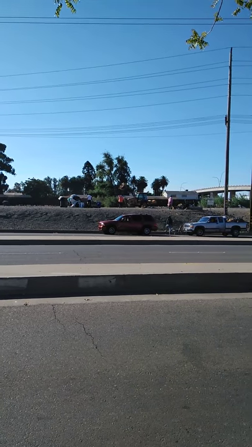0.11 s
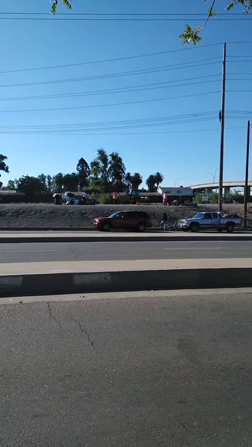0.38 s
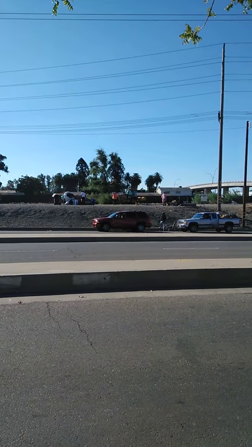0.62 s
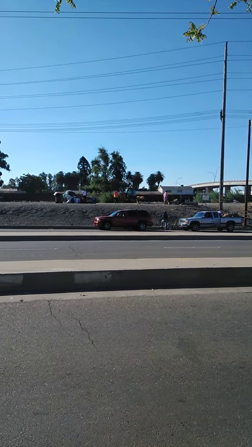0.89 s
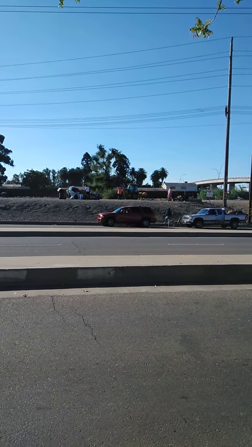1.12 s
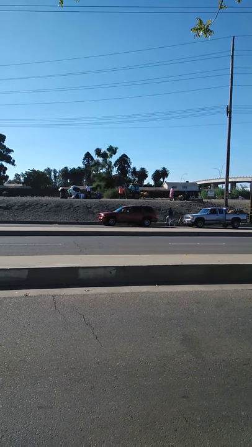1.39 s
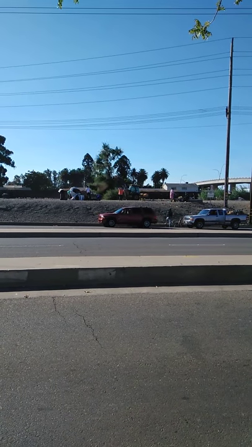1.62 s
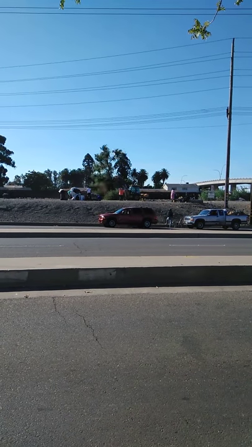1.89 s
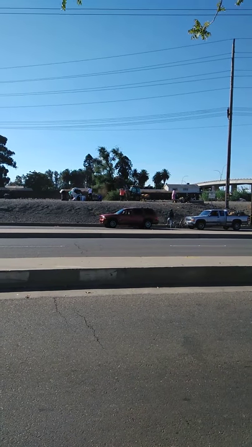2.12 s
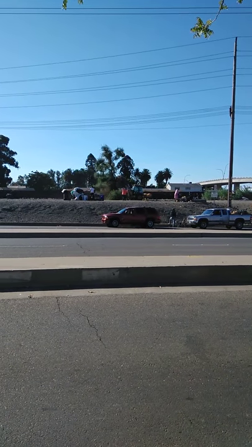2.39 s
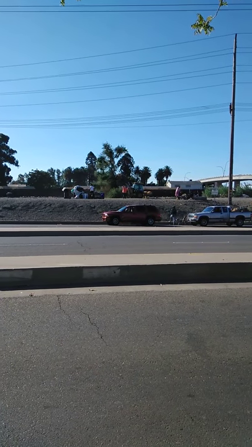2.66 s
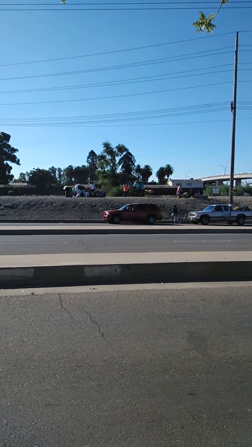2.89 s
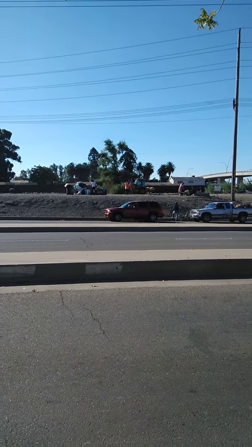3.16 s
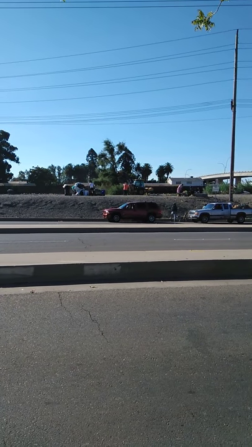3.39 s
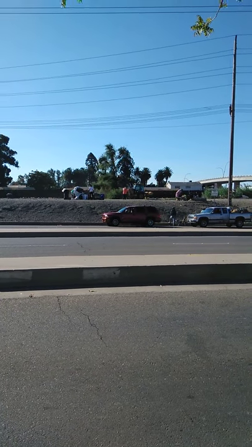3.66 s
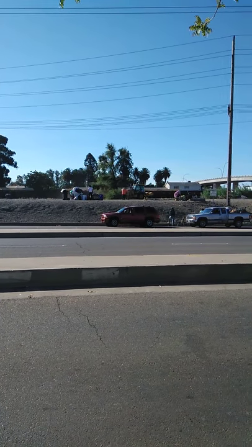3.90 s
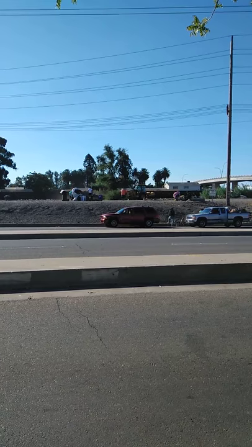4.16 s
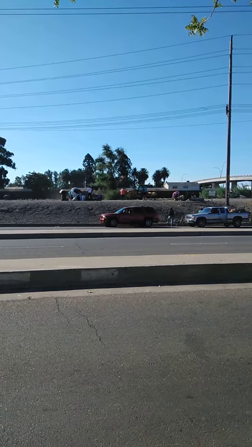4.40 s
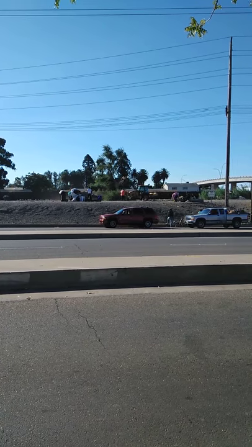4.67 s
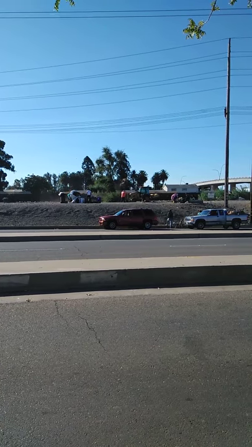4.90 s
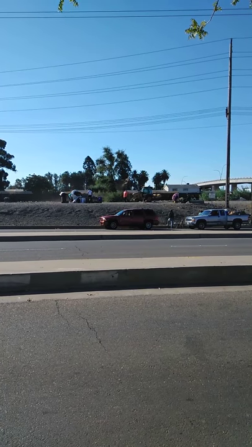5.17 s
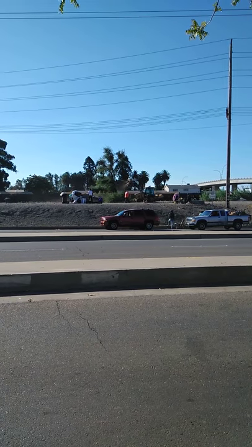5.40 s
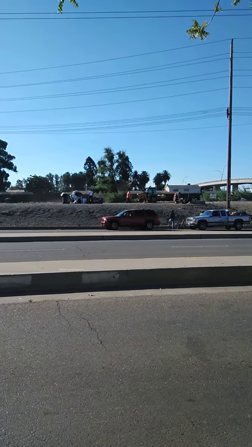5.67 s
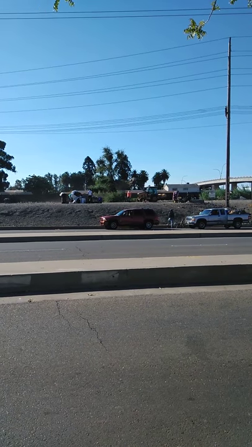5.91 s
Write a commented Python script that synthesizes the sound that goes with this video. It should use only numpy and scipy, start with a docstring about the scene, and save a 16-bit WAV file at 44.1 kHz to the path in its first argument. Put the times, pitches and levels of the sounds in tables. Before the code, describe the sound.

Open air beside a road, heard on a handheld phone whose two channels differ in phase and brightness. From 0 s a bulldozer diesel is already climbing, a low pulsing exhaust tone with roar, gritty knock, valve clatter and steady airy hiss, plus a very faint fuzzy high whistle. At 0.85-1.3 s it peaks with a crowded burst of thuds, bright clangs and a ringing blade tone. Revs fall until about 2.1 s, leaving hiss and small knocks. It climbs again from 2.3 to 2.95 s, then drops; a loud hollow steel clonk rings at 3.15 s, with lesser clanks to 3.8 s. A third climb reaches its top around 4.3-4.5 s, when tracks rattle and clang repeatedly until about 5.3 s. The engine sinks and fades to 6 s amid small hollow taps. A second engine's low hum swells at times over faint road rumble.

```python
"""A bulldozer's diesel revs up three times under load: firing orders plus noise that puffs once a firing.
A turbocharger whistle, a chirp of fuzzy tone, climbs with the revs. Steel blade and tracks thud, clang and
rattle: noise bursts that ring plate modes, hollow knocks and one long blade tone. A second engine hums and
swells, one wavering tone, over faint road rumble. A two-port phone hears the bass in opposed polarity."""
import sys
import numpy as np
from scipy import signal
from scipy.fft import rfft, irfft
from scipy.io import wavfile
from scipy.ndimage import uniform_filter1d

SR = 44100
rng = np.random.default_rng(int(sys.argv[2]) if len(sys.argv) > 2 else 0)


def elevation(decibels):
    """Turn decibel levels (scalar or array-like) into linear amplitude ratios."""
    levels = np.asarray(decibels, float)
    return 10 ** (levels / 20)


def pcm_store(signal):
    """Save signal as 16-bit PCM."""
    levels = np.round(np.clip(np.atleast_2d(signal), -1, 1) * 32767)
    wavfile.write(sys.argv[1], SR, levels.astype(np.int16).T)


N = 266319

# Diesel. Each row: time in s, firing rate in Hz, exhaust tone in dB, exhaust roar in dB, fan and intake hiss in dB.
DIESEL = [(0, 58.5, -39.5, -38.5, -38.5), (0.199, 59.83, -28, -44, -39), (0.698, 64.37, -37.5, -36, -39.5),
          (.82, 65, -58, -38.5, -39), (.94, 64.8, -28, -30, -42), (1.06, 67.5, -39, -27.5, -31),
          (1.3, 58.32, -40, -36, -38), (1.649, 48.4, -79, -48, -40), (1.8, 42.83, -67, -67, -39),
          (2.148, 37.8, -55.5, -59.5, -44), (2.32, 45.33, -51, -58.5, -40),
          (2.416, 51.95, -36, -49.5, -39.5), (2.799, 61.16, -31, -36.5, -38.5),
          (2.969, 64.8, -45, -38, -46), (3.3, 42.1, -88, -49, -46.5), (3.499, 37.73, -55.5, -64, -46),
          (3.78, 49.2, -34.5, -44.5, -40), (4.254, 61.93, -32.5, -39.5, -35.5),
          (4.502, 60.6, -46, -40, -48), (4.95, 47.8, -77, -51.5, -35.5), (5.121, 43.7, -74, -55.5, -96),
          (5.3, 40.87, -71, -57, -38), (5.45, 40.4, -72, -64, -52.5), (5.619, 38.1, -79, -77, -47.5),
          (5.798, 36.3, -69, -70, -62), (6.04, 34.4, -78, -78, -78)]
# Exhaust orders. Each row: multiple of the firing rate, relative level in dB before the pipe.
EXHAUST_ORDERS = [(1, -1), (2, 0), (3, -6), (4, -8), (5, -6), (6, -8), (7, -9)]
# Exhaust pipe response. Each row: frequency in Hz, gain in dB.
PIPE = [(35, -24), (50, -11), (62, 0), (125, 0), (160, -4), (200, -9), (260, -16)]
# Exhaust roar spectrum. Each row: frequency in Hz, relative density in dB per Hz.
ROAR = [(30, -31), (60, -31), (150, 8), (260, 3.5), (450, -8.5), (700, 0.5), (1200, -40.5)]
# Spectrum of the growl under load. Each row: frequency in Hz, relative density in dB per Hz.
GROWL = [(150, -22), (240, -1.5), (340, -1), (520, -0.5), (640, -38), (900, -68)]
# Growl over time. Each row: time in s, level in dB.
LOAD = [(0, -72), (.2, -46), (.45, -42.5), (.7, -43), (1.3, -38), (1.65, -44), (1.8, -60), (2.15, -63.5),
        (2.45, -55), (2.7, -44.5), (2.9, -42.5), (3.06, -40.5), (3.151, -43), (3.501, -57), (3.8, -45.5),
        (4.25, -42), (4.5, -43), (4.95, -40), (5.121, -58.5), (5.45, -63.5), (6.04, -68)]
# Diesel knock spectrum. Each row: frequency in Hz, relative density in dB per Hz.
KNOCK = [(300, -22), (600, -16), (800, -8), (1000, -2), (1200, 0), (1300, -6), (1430, -11), (1580, -11),
         (1700, -16), (1950, -32), (5000, -40)]
# Valve clatter spectrum, ringing higher in the block. Each row: frequency in Hz, relative density in dB per Hz.
CLATTER = [(1300, -30), (1600, -15), (1770, 1), (1900, -8), (2010, -25), (2210, -5), (2400, -20),
           (2560, -8), (2680, -12), (2850, -6), (3060, -16), (3350, 0), (3800, -14), (5000, -30)]
# Mid-range rattle of the diesel. Each row: time in s, knock in dB, valve clatter in dB.
RATTLE = [(0, -49, -46.5), (.2, -45, -42.5), (.45, -45, -42.5), (.7, -40, -42.5), (1.402, -49, -38.5),
          (1.801, -59, -51), (2.05, -58, -54.5), (2.301, -57, -50.5), (2.45, -52, -49), (2.7, -46, -43),
          (2.899, -41.5, -43), (3.05, -55, -53), (3.5, -49.5, -52.5), (3.75, -52, -45), (3.92, -52.5, -51),
          (4.1, -46.5, -39), (4.301, -47.5, -42.5), (4.601, -43.5, -45), (5.1, -64, -45.5),
          (5.601, -60, -48.5), (5.8, -59, -78), (6.04, -67, -93)]
# Fan and intake hiss spectrum. Each row: frequency in Hz, relative density in dB per Hz.
HISS = [(1500, -34), (3100, -20), (3450, -6), (3800, -11), (4100, -3), (4570, 1), (4880, -5), (5200, 1),
        (5600, -4), (6150, -1), (7000, -5), (8200, -1), (10800, -5), (12000, -16), (14000, -28),
        (16000, -40)]
# Turbocharger whistle, once a rev. Each row: start in s, length in s, start frequency in Hz, level in dB.
TURBO = [(0, 0.29, 12400, -53.5), (2.282, 0.51, 11950, -57), (3.592, 0.6, 11800, -62)]
SPIN_HZ_PER_S, SPIN_IN_S, SPIN_IN_DB, SPIN_OUT_S, SPIN_OUT_DB = 5800, .2, -7, .1, -19

# Blows. Each row: start in s, relative dull thud in dB, relative bright clang in dB, t60 of the rattle in s.
BLOWS = [(0.842, -23.5, -34, 0.55), (0.865, -27, -43, 1), (.957, -19, -27, 0.31), (1.03, -28, -35, .99),
         (1.077, -21.5, -26.5, 0.62), (1.103, -17, -30.5, 0.66), (1.14, -23.5, -41, 0.42),
         (1.17, -26, -20.5, 0.51), (1.24, -34.5, -50, 0.77), (1.424, -40.5, -29, 1), (1.52, -39, -44, 1),
         (2.609, -56, -66, .2), (2.902, -37.5, -60, 0.078), (3.013, -41, -68, 0.23),
         (3.136, -47, -34.5, 0.47), (3.154, -30, -40, 0.43), (3.333, -44, -35.5, 0.34),
         (3.442, -67, -50.5, 0.97), (3.531, -45, -41, 0.68), (3.597, -36, -28, 0.34),
         (3.673, -35, -53, 0.14), (3.759, -61, -37, 0.25), (3.951, -38, -62, 1), (4.391, -29.5, -40, 0.23),
         (4.419, -27, -21, 0.17), (4.44, -32, -26, 0.54), (4.469, -37, -37.5, 1), (4.6, -31, -22.5, 0.22),
         (4.632, -29, -27, 0.15), (4.707, -27, -38, 0.86), (4.734, -22.5, -17, 0.28),
         (4.751, -32, -24.5, 0.38), (4.81, -28.5, -28.5, 0.79), (4.908, -26, -32.5, 0.26),
         (5.06, -105, -40.5, 0.64), (5.16, -35, -43.5, 0.59), (5.201, -46, -27, 0.36),
         (5.24, -36, -34.5, 0.49), (5.3, -33.5, -32.5, 0.32), (5.464, -37, -44, 0.34),
         (5.505, -89, -37, 0.27), (5.646, -73, -41.5, 0.46), (5.85, -60, -50.5, 0.64),
         (5.931, -63, -55, 0.3)]
# Thud spectrum. Each row: frequency in Hz, relative density in dB per Hz.
THUD = [(80, -32), (200, -11.5), (550, 3.5), (800, 10), (1200, 7.5), (1450, 1), (1800, 4), (3300, 0.5),
        (6000, -13.5), (10000, -30)]
# Clang spectrum. Each row: frequency in Hz, relative density in dB per Hz.
CLANG = [(500, -59), (1500, -6), (2900, -2), (3250, -8.5), (3600, -2.5), (4100, -3.5), (4650, -5.5),
         (5000, -5), (5850, -5.5), (5960, -10), (6100, -6), (6220, -5.5), (7000, -4), (7600, -6),
         (7900, -6), (9500, -1.5), (11000, -8), (13500, -20.5), (15500, -17)]
# Steel plate modes. Each row: frequency in Hz, relative level in dB before per-blow scatter, t60 in s.
STEEL = [(470, -6, .12), (585, -7, .25), (700, -10, .04), (830, -9, .06), (950, -10, .04), (1060, -9, .05),
         (1190, -8, .09), (1235, -10, .12), (1400, -10, .04), (1525, -9, .15), (1725, -5, .15),
         (1782, -4, .08), (1868, -3, .08), (2170, -7, .1), (2910, -3, .07), (3133, -6, .08), (3530, 2, .04),
         (3665, 2, .04), (3785, 1, .05), (4050, -2, .04), (4350, 0, .03), (4605, -1, .05), (4680, 1, .06),
         (5020, -2, .03), (5310, 0, .05), (5500, -2, .04), (5710, -5, .09), (6315, -4, .08),
         (6740, -3, .05), (6880, -3, .04), (7875, -2, .08), (7960, -2, .05), (8230, -1, .04),
         (8880, -2, .05), (9450, -1, .05), (10050, -1, .07), (11300, -1, .05), (11760, -3, .06),
         (12400, 0, .06), (13350, 3, .06)]
THUD_RISE_S, CLANG_RISE_S = 0.009, 0.015
THUD_SNAP, CLANG_SNAP = 0.25, 0.45  # power of the rise: smaller is more sudden
THUD_RING_DB = -8  # dull blows ring the plates less
# Blows that leave the blade ringing. Each row: start in s, peak level in dB.
RINGS = [(0.958, -36.5), (3.326, -39.5), (3.758, -54), (3.951, -49), (4.39, -37.5), (4.416, -50),
         (5.2, -50)]
BLADE_HZ, BLADE_T60_S = 1293, 2.2
# Hollow, pitched knocks of the frame. Each row: start in s, level in dB of a sine of equal peak, pitch in Hz, t60 in s.
HOLLOW = [(0.848, -31, 334, 0.17), (1.015, -30, 2170, 0.28), (1.1, -41, 467, 0.25),
          (1.601, -35.5, 148, 0.29), (1.936, -52, 338, 0.17), (2.031, -47, 1168, 0.35),
          (2.195, -45, 810, 0.077), (2.2, -45, 147, 0.1), (2.26, -46, 1173, 0.23),
          (2.39, -44.5, 1034, 0.23), (2.8, -41, 1116, 0.45), (2.89, -37, 1756, 0.26),
          (3.15, -23.5, 591.3, 0.48), (3.16, -33, 813, 0.19), (3.16, -36.5, 287, 0.28),
          (3.175, -35.5, 430, 0.22), (3.59, -37.5, 817.5, 0.44), (4.6, -34, 323, 0.4),
          (4.769, -35, 326, 0.27), (4.94, -33, 596, 0.26), (5.16, -42.5, 471, 0.42), (5.16, -50, 850, 0.28),
          (5.243, -35.5, 533, 0.23), (5.31, -39, 1198, 0.18), (5.321, -42, 1760, 0.34),
          (5.335, -39, 590, 0.23), (5.465, -46, 1307, 0.28), (5.514, -42, 1803, 0.12),
          (5.558, -44, 1750, 0.13), (5.465, -56, 826, 0.24), (5.471, -45, 158, 0.085),
          (5.65, -45, 1723, 0.16), (5.548, -47, 354, 0.06), (5.795, -46, 464, 0.099),
          (5.851, -52, 1095, 0.14), (5.964, -54, 403, 0.046)]

# Second engine: swells over idle. Each row: time of the top in s, rise in dB, swell time in s, drop time in s.
SWELLS = [(.4, 15.7, 1, 0.37), (.9, 14, 0.72, 0.4), (1.62, 12, 0.12, 0.13), (2.95, 18.4, 0.68, 0.19),
          (4.3, 14.4, 0.9, 0.36)]
HUM_HZ, HUM_IDLE_DB = 70, -50
# Far road spectrum. Each row: frequency in Hz, relative density in dB per Hz.
TRAFFIC = [(60, -4.5), (130, 1.5), (250, -7.5), (400, -4), (550, 2.5), (850, -3), (1100, -14), (1500, -10),
           (2300, -1.5), (3200, -19), (4500, -35)]
TRAFFIC_DB = -59

# The case shades the engines at the right port. Each row: frequency in Hz, gain in dB.
ENGINE_SHADE = [(500, -2.5), (1200, 1), (1800, -1.5), (2250, -10), (2800, -0.5), (3500, -7), (4500, -2),
                (6500, -7.5), (7700, -3.5), (10000, -23)]
# The steel lies to another side and is shaded otherwise there. Each row: frequency in Hz, gain in dB.
STEEL_SHADE = [(450, -5.5), (900, -1), (1250, -2), (2000, 0.5), (2800, -2), (4200, -4), (7000, -2.5),
               (7600, -5), (9000, -5.5)]
# Left port, with notches cut by echoes off the ground and the case. Each row: frequency in Hz, gain in dB.
LEFT = [(560, 0), (680, -8), (800, 1), (1300, 0), (1420, -2), (1650, 0), (2030, -2), (2750, -4), (3400, 0),
        (3900, -1), (4250, 0)]
# Right port response, before drift. Each row: frequency in Hz, gain in dB.
RIGHT = [(40, 3), (90, 0), (250, -.5), (450, -3.5), (800, -11), (1250, 1), (1800, -11), (2300, -6),
         (2750, -7), (3300, -2), (4100, -7), (5000, -4), (6800, -4), (8500, -13), (11000, -25)]
# Sound common to both ports. Each row: frequency in Hz, share as an amplitude from 0 to 1.
COMMON = [(60, .99), (400, .98), (1000, .87), (1180, .8), (1250, .99), (1340, .99), (1420, .75),
          (2000, .66), (5000, .62), (10000, .84)]
# Phase of the right port's direct sound. Each row: frequency in Hz, lead in radians.
LEAD = [(60, 3.82), (280, 3.554), (600, 3.05), (1000, 4.35), (1450, 4.9), (2000, 11.46), (2900, 11.07),
        (3700, 16.18), (5300, 17.6), (10000, 21.6)]
# Right port treble as the hand-held phone drifts. Each row: time in s, gain in dB far above DRIFT_HZ.
DRIFT = [(0, 4.5), (.7, 3), (1.2, 3.5), (1.8, 2.5), (2.3, -1.5), (2.9, 2.5), (3.3, 0.5), (3.8, 4), (4.3, 4),
         (4.8, 2.5), (5.3, 4.5), (5.7, -0.5), (6.04, -8)]
DRIFT_HZ = 1500  # half the drift in dB applies here
# How far weak patches of the spectrum can be emptied. Each row: frequency in Hz, lowest gain in dB.
DEEPEST = [(150, 0), (400, -9), (900, -12), (1450, -18), (1800, -40)]


def evened(x):
    """Scales to rms 1."""
    return x / np.sqrt(np.mean(x ** 2) + 1e-20)


def read(points, hz):
    """Reads a spectrum table on a log-frequency axis."""
    f_hz, value = np.transpose(points)
    return np.interp(np.log(hz + 1), np.log(f_hz + 1), value)


def over_time(rows):
    """Interpolates each column of a time table to every sample."""
    s, *columns = np.transpose(rows)
    return [np.interp(np.arange(N) / SR, s, column) for column in columns]


def coloured(x, points):
    """Filters x by a spectrum table."""
    gain_db = read(points, np.fft.rfftfreq(len(x), 1 / SR))
    return irfft(rfft(x) * elevation(gain_db), len(x))


def wobble(hz):
    """Random signal of rms 1, low-passed at hz."""
    steps = rng.standard_normal(N // 16 + 2)
    slow = signal.sosfilt(signal.butter(2, hz, fs=SR / 16, output="sos"), steps)
    return evened(np.interp(np.arange(N) / 16, np.arange(len(slow)), slow))


def patchy(points, patchy_db, flicker_db, size, count):
    """Noise of a given spectrum and rms 1, with level patches four bins wide lasting about count frames."""
    a, b, patches = rng.standard_normal((4 * N // size + 5, size // 2 + 1, 3)).T
    flicker = evened(uniform_filter1d(patches[0], size=count // 3))
    patches = uniform_filter1d(patches, size=4, axis=0)
    patches = evened(uniform_filter1d(patches, size=count, axis=1))
    z = (a + 1j * b) * elevation(patchy_db * patches + flicker_db * flicker)
    noise = signal.istft(z, nperseg=size, noverlap=3 * size // 4)[1][:N + 1]
    return evened(coloured(noise, points)[:N])


def diesel():
    """Clean low firing orders, with roar, growl, knock, clatter and hiss that puff once a firing."""
    firing_hz, tone_db, roar_db, hiss_db = over_time(DIESEL)
    knock_db, clatter_db = over_time(RATTLE)
    growl_db, = over_time(LOAD)
    turns = np.cumsum(firing_hz) / SR
    tone = 0
    for k, db in EXHAUST_ORDERS:
        waver_db = 1.6 * min(k, 3) * wobble(57.0)
        order_db = db + read(PIPE, k * firing_hz) + waver_db
        tone = tone + elevation(order_db) * np.cos(2 * np.pi * (k * turns + rng.random()))
    puff = np.exp(-(turns % 1) / .35)  # the constant added below makes the puffing shallower
    roar = patchy(ROAR, 2.5, 1.5, size=1024, count=9) * evened(.5 + puff)
    growl = patchy(GROWL, 2.5, 1.5, size=1024, count=9) * evened(.3 + puff)
    knock = patchy(KNOCK, 4.5, 2.0, size=512, count=30) * evened(.9 + puff)
    clatter = patchy(CLATTER, 3.0, 2.0, size=512, count=36) * evened(.9 + puff)
    hiss = patchy(HISS, 2.45, 0.24, size=512, count=24) * evened(1.5 + puff)
    exhaust = elevation(tone_db) * evened(tone) + elevation(roar_db) * roar + elevation(growl_db) * growl
    return exhaust + elevation(knock_db) * knock + elevation(clatter_db) * clatter + elevation(hiss_db) * hiss


def turbo():
    """A broad fuzzy whistle that climbs as the charger spins up."""
    out, t = np.zeros(N), np.arange(N) / SR
    fuzz = wobble(500.) + 1j * wobble(500.)
    for s, length_s, hz, db in TURBO:
        age_s = t - s
        turns = hz * age_s + SPIN_HZ_PER_S * age_s ** 2 / 2
        knots_s = [0, SPIN_IN_S, length_s - SPIN_OUT_S, length_s]
        ends_db = np.interp(age_s, knots_s, [SPIN_IN_DB, 0, 0, SPIN_OUT_DB])
        whistle = (fuzz * np.exp(2j * np.pi * turns)).real
        out += (age_s >= 0) * (age_s < length_s) * elevation(db + ends_db) * whistle
    return out


def faded(x):
    """Fades out the second half of x."""
    return x * signal.windows.tukey(2 * len(x), .5)[len(x):]


def strike(t, rise_s, snap, t60_s):
    """Envelope of a blow: a power-law rise, then an exponential fall."""
    return np.clip(t / rise_s, 0, 1) ** snap * elevation(-60 * np.maximum(t - rise_s, 0) / t60_s)


def blows():
    """Each blow is a shower of small knocks, dull in soil and frame, bright on the tracks; all ring the plates."""
    out, t = np.zeros(N + SR), np.arange(SR // 2) / SR
    hz, db, t60_s = np.transpose(STEEL)[:, :, None]
    short = t[:SR // 4]
    for s, thud_db, clang_db, fall_s in BLOWS:
        dull, bright, size, struck = rng.standard_normal((4, len(t)))
        grains = elevation(2.0 * evened(uniform_filter1d(size, size=60)))  # uneven knocks, a millisecond or two apart
        thud = elevation(thud_db) * evened(coloured(dull * grains, THUD))
        thud = thud * strike(t, THUD_RISE_S, THUD_SNAP, fall_s)
        clang = elevation(clang_db) * evened(coloured(bright * grains, CLANG))
        clang = clang * strike(t, CLANG_RISE_S, CLANG_SNAP, fall_s)
        # each blow lands elsewhere, so the modes differ in level and phase
        where_db, phase = 2.1 * struck[:len(hz), None], 2 * struck[-len(hz):, None]
        modes = elevation(db + where_db - 60 * short / t60_s) * np.sin(2 * np.pi * hz * short + phase)
        plates = modes.sum(0)
        plates = plates / np.linalg.norm(plates)
        ringing = signal.fftconvolve(elevation(THUD_RING_DB) * thud + clang, plates)[:len(t)]
        out[round(s * SR):][:len(t)] += faded(elevation(-2.8) * (thud + clang + ringing))
    return out[:N]


def blade():
    """The blade's one lasting mode, a decaying sine faded out within half a second."""
    out, t = np.zeros(N + SR), np.arange(SR // 2) / SR
    ring = np.clip(t / 0.022, 0, 1) * elevation(-60 * t / BLADE_T60_S) * np.sin(2 * np.pi * BLADE_HZ * t)
    for s, db in RINGS:
        out[round(s * SR):][:len(t)] += elevation(db) * faded(ring)
    return out[:N]


def hollow():
    """A short shove of noise in one resonance of the frame."""
    out, t = np.zeros(N + SR), np.arange(SR // 2) / SR
    for s, db, hz, t60_s in HOLLOW:
        shove = rng.standard_normal(len(t)) * t * np.exp(-t / 0.0073)
        resonance = elevation(-60 * t / t60_s) * np.sin(2 * np.pi * hz * t)
        knock = signal.fftconvolve(shove, resonance)[:len(t)]
        out[round(s * SR):][:len(t)] += np.sqrt(2) * elevation(db) * knock / abs(knock).max()
    return out[:N]


def hum():
    """The second engine: one firing tone, wavering in pitch and level, that swells and drops back."""
    t = np.arange(N) / SR
    turns = np.cumsum(HUM_HZ + 0.36 * wobble(3.65)) / SR
    waver_db = .9 * wobble(6.)
    swell_db = sum(np.interp(t, [s - up_s, s, s + down_s], [0, db, 0]) for s, db, up_s, down_s in SWELLS)
    return np.sqrt(2) * elevation(HUM_IDLE_DB + swell_db + waver_db) * np.cos(2 * np.pi * turns)


def traffic():
    """A faint, fluttering rumble of the far road: patchy noise."""
    return elevation(TRAFFIC_DB) * patchy(TRAFFIC, patchy_db=4., flicker_db=2., size=1024, count=6)


def scene():
    """Engines, road and steel at the two ports, shaded two ways at the right one."""
    engines = diesel() + turbo() + hum() + traffic()
    steel = blows() + blade() + hollow()
    right = coloured(engines, ENGINE_SHADE) + coloured(steel, STEEL_SHADE)
    return np.array([engines + steel, right])


def ports(dry):
    """The right port is opposed in the bass, duller, and hears part of the sound scattered in phase."""
    hz, t, z = signal.stft(dry, SR, nperseg=512, noverlap=384)
    left = elevation(read(LEFT, hz))[:, None]
    drift_db = np.interp(t, *np.transpose(DRIFT)) * (hz / (hz + DRIFT_HZ))[:, None]
    right = elevation(read(RIGHT, hz))[:, None] * elevation(drift_db)
    common = np.clip(read(COMMON, hz), 0, 1)[:, None]
    direct = common * np.exp(1j * read(LEAD, hz))[:, None]
    scatter = 2 * np.exp(2j * np.pi * rng.random(z[1].shape))
    scattered = np.sqrt(1 - common ** 2) * scatter
    z = np.array([left * z[0], right * (direct + scattered) * z[1]])
    return signal.istft(z, SR, nperseg=512, noverlap=384)[1][:, :N]


def empty_weak_patches(x, below_db, valley_db, steep):
    """Empties patches of the spectrum far under the left port's mean level of the moment or their neighbours."""
    hz, _, z = signal.stft(x, SR, nperseg=1024, noverlap=768)
    power = uniform_filter1d(uniform_filter1d(abs(z) ** 2, size=4, axis=1), size=9, axis=2)
    level_db = 10 * np.log10(abs(power) + 1e-18)
    around_db = 10 * np.log10(abs(uniform_filter1d(power, size=25, axis=1)) + 1e-18)
    mean_db = level_db[0, 20:260].mean(0)
    threshold_db = np.maximum(mean_db - below_db, around_db - valley_db)
    cut_db = np.clip(steep * (level_db - threshold_db), read(DEEPEST, hz)[:, None], 0)
    return signal.istft(z * elevation(cut_db), SR, nperseg=1024, noverlap=768)[1][:, :N]


def band_limit(x):
    """A steep low-pass at the top of the band."""
    return signal.sosfilt(signal.butter(12, 15780, fs=SR, output="sos"), x)


def record(dry):
    """The phone: two ports, then weak patches of the spectrum emptied."""
    mix = empty_weak_patches(ports(dry), below_db=13.7, valley_db=4.2, steep=8.)
    return band_limit(mix)


dry = scene()
out = record(dry)
pcm_store(out)
```